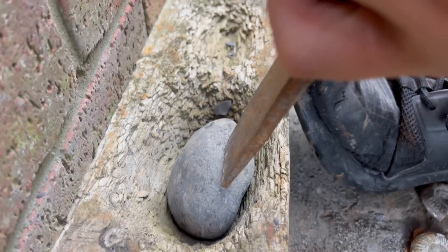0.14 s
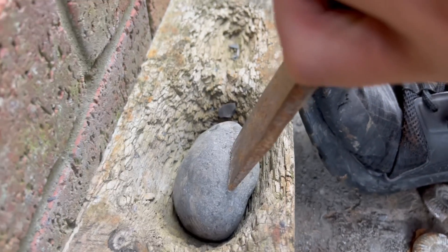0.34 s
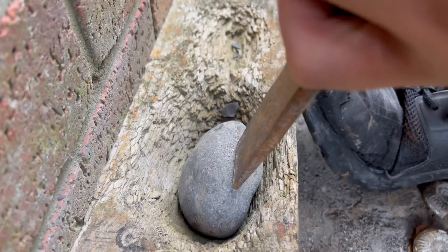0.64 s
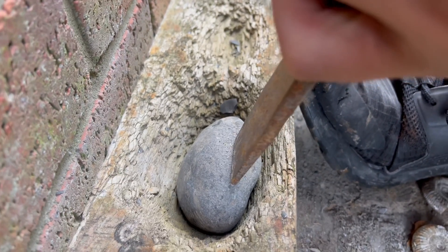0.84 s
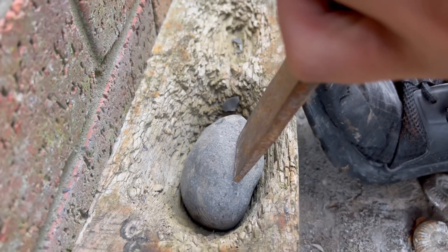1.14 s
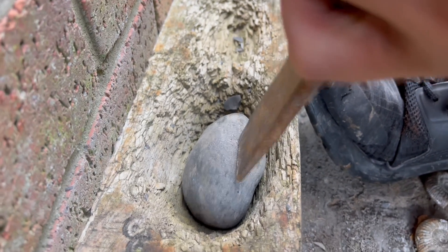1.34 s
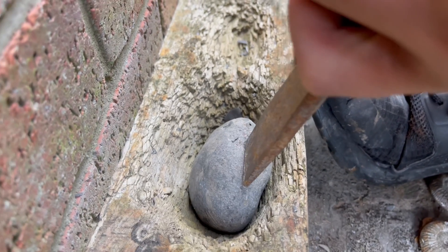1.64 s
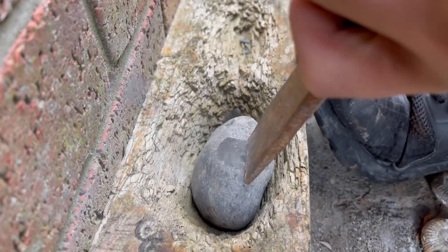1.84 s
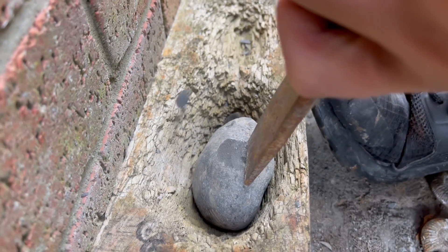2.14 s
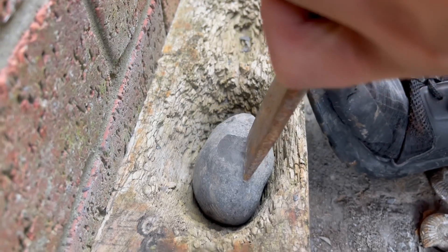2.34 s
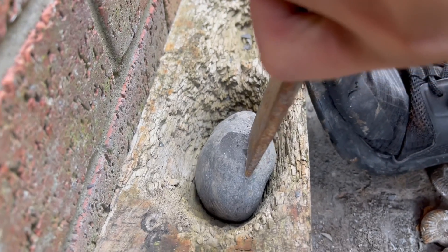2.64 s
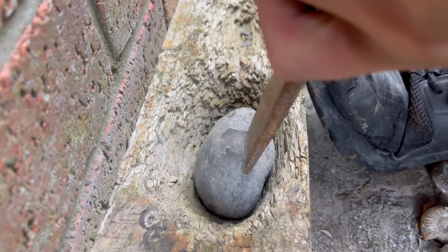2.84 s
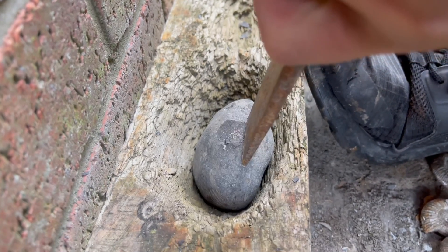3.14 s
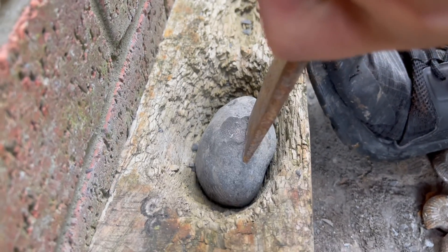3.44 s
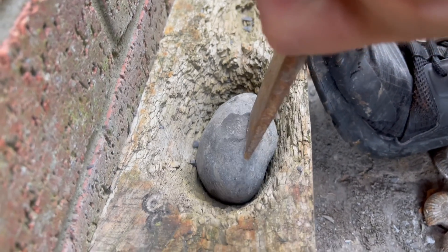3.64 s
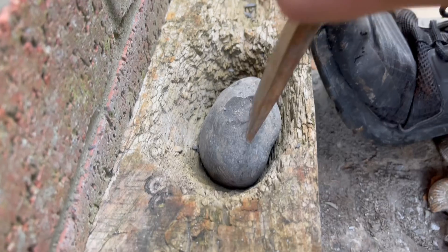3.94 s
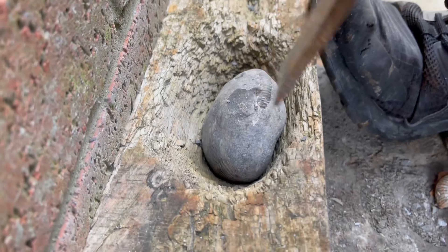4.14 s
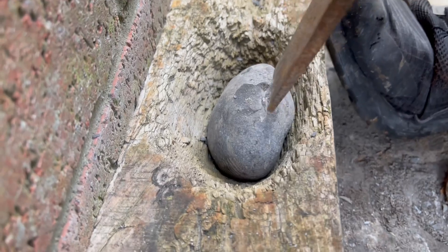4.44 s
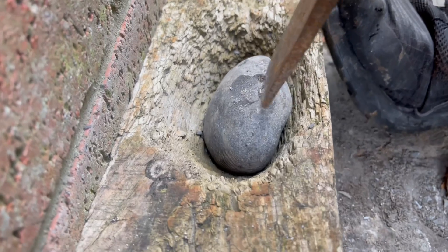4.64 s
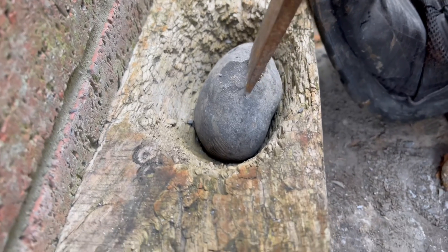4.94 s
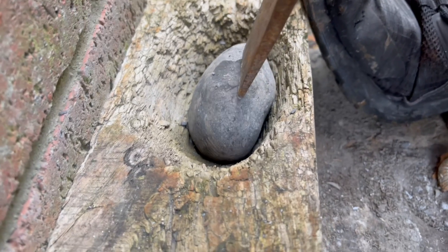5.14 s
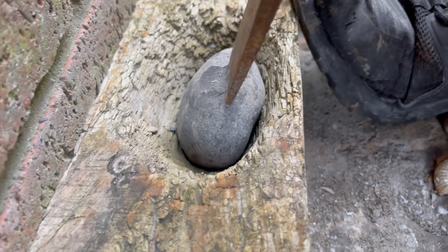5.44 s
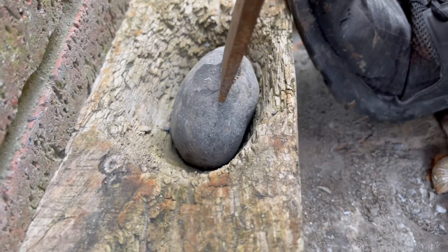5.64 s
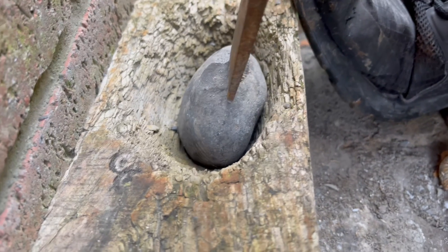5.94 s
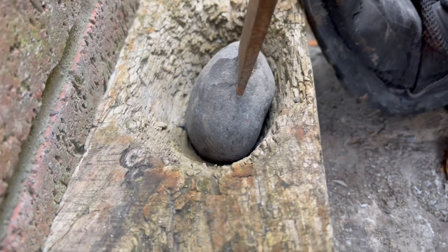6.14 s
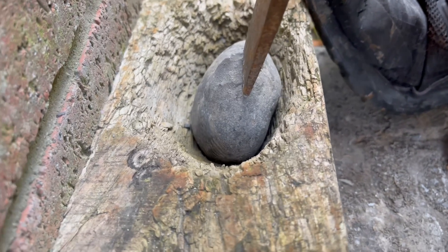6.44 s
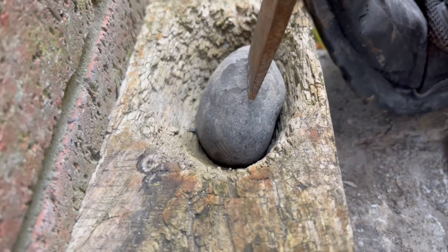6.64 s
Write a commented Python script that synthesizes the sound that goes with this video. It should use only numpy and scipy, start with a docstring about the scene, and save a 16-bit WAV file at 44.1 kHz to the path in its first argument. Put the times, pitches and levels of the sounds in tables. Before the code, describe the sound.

Steady chiselling on stone, about two blows a second, heard in stereo from very near. Each hit is a dry gritty crack, a brief steel ring and a quick falling wooden thud. Flakes patter after some blows. Midway the striking stops for a clink and soft scrapes; the next hit sounds looser and duller, then the firm rhythm returns in a quietly echoing yard.

```python
"""A hammer taps a steel chisel on a stone nodule that lies in a hollow of a wooden plank, outdoors and close by.
Each blow is a short gritty crack of filtered noise, a brief steel ring and a falling thud swept by the plank.
Chips tick down as tiny noise bursts, and in a pause the chisel clinks and scrapes its way to a new spot.
The yard answers with dense decaying echoes; low air rumble flutters over a steady distant hush."""
import sys
import numpy as np
from scipy import signal
from scipy.fft import rfft, irfft
from scipy.io import wavfile
from scipy.ndimage import uniform_filter1d

SR = 44100
rng = np.random.default_rng(int(sys.argv[2]) if len(sys.argv) > 2 else 0)


def to_wav(sig):
    """Store sig (one row per channel, or 1-D mono) as 16-bit WAV at the path in sys.argv[1].

    Samples outside -1..1 are clipped; the rate is SR.
    """
    pcm = np.clip(np.atleast_2d(sig), -1, 1) * 32767
    pcm = np.round(pcm).astype(np.int16)
    wavfile.write(sys.argv[1], SR, pcm.T)  # frames by channels


N = 299880  # length of the scene in samples

SIZE, LEAD = 16384, 256  # samples in one sound, and samples kept before its onset
HZ = np.maximum(np.fft.rfftfreq(SIZE, 1 / SR), 1)
AGE = np.arange(SIZE) / SR  # seconds since the onset
EDGES = np.interp(np.arange(SIZE), [0, LEAD / 2, .6 * SIZE, .85 * SIZE], [0, 1, 1, 0])
RIPPLE_HZ = 1800  # width over which a burst of fractures is evened out


def undb(db):
    """Decibels to gain."""
    return 10 ** (np.asarray(db) / 20)


def shape(points, hz):
    """Gain at hz of (freq_hz, level_db) points joined on a log-frequency axis."""
    at_hz, level_db = np.transpose(points)
    return undb(np.interp(np.log(np.maximum(hz, 1)), np.log(at_hz), level_db))


def bands(centres_hz, levels_db):
    """Smooth colour through a few band levels."""
    return shape(list(zip(centres_hz, levels_db)), HZ)


def causal(gain):
    """Minimum-phase response with this gain: each peak rings on after the push."""
    cepstrum = irfft(np.log(gain))
    cepstrum[1:SIZE // 2] *= 2
    cepstrum[SIZE // 2 + 1:] = 0
    return np.exp(rfft(cepstrum))


def fade(t60_s):
    """Exponential decay that falls 60 dB in t60_s."""
    return np.exp(-np.log(1000) * AGE / t60_s)


def add(track, start_s, sound):
    """Mix a sound with soft edges into both channels, its onset at start_s."""
    start = int(start_s * SR) - LEAD
    part = (np.roll(sound, LEAD, axis=-1) * EDGES)[..., :N - start]
    track[:, start:start + part.shape[-1]] += part


def widen(mid, side, apart):
    """Left and right from a shared part and a side part; apart is the side share."""
    return np.array([mid + apart * side, mid - apart * side])


def noise(points, apart):
    """Steady stereo noise of unit level with the given colour."""
    white = rng.standard_normal((2, N))
    mid, side = irfft(rfft(white) * shape(points, np.fft.rfftfreq(N, 1 / SR)), N)
    pair = widen(mid, side, apart)
    return pair / pair.std()


def crunch(contact_s, apart=0.21):
    """Stereo spectra of a burst of tiny fractures that swells and dies within a few contact times."""
    rise = 2 * AGE / contact_s
    shared, left, right = rfft(rng.standard_normal((3, SIZE)) * rise * np.exp(-rise))
    pair = shared + apart * np.array([left, right])
    # white overall; the narrower peaks that remain give every contact its own colour
    smooth_power = uniform_filter1d(abs(pair) ** 2, int(RIPPLE_HZ * SIZE / SR), axis=-1)
    return pair / np.sqrt(smooth_power)


def ring(modes, build_s, detune):
    """Modes build up as waves return from the ends; grip and seating shift them a little each time."""
    tones = np.zeros(SIZE)
    for hz, level_db, t60_s in modes:
        shifted_hz = hz * (1 + detune * rng.standard_normal())
        tones += undb(level_db) * fade(t60_s) * np.sin(2 * np.pi * shifted_hz * AGE)
    return tones * (1 - np.exp(-AGE / build_s))


# swell of the low rumble of air on the microphone, before breeze_db and flutter: time_s, level_db
BREEZE = [(0, -56.5), (.6, -58), (1.45, -54), (2.1, -61), (3.55, -59.5), (3.78, -45), (4.2, -58),
          (5.6, -60), (6.301, -58.5), (6.8, -44)]
# colour of that rumble: freq_hz, level_db
RUMBLE_COLOUR = [(12, -46), (25, -18), (45, 0), (70, 4.5), (120, -6), (200, -13.5), (320, -30), (600, -47),
                 (3000, -100)]
# colour of the far hush: freq_hz, level_db
HUSH_COLOUR = [(100, -9.5), (250, 0), (450, -4), (850, 3), (1200, -6), (1800, -13.5), (2600, -24.5),
               (4000, -31), (7000, -36.5), (10500, -33), (13500, -45.5), (17000, -53)]
HUSH_DB = -70


def air(breeze_db=1.0, flutter_db=2.5, flutter_s=.12):
    """Low rumble that swells and flutters over a steady far hush."""
    t = np.arange(N) / SR
    time_s, level_db = np.transpose(BREEZE)
    steps = rng.standard_normal(size=256)
    flutter = np.interp(t / flutter_s, np.arange(len(steps)), steps)
    gust = undb(breeze_db + np.interp(t, time_s, level_db) + flutter_db * flutter)
    return gust * noise(RUMBLE_COLOUR, apart=0.089) + undb(HUSH_DB) * noise(HUSH_COLOUR, apart=0.94)


# bending wave of the plank: freq_hz, level_db
THUD_COLOUR = [(20, -18.5), (42, -14.5), (58, -9.5), (80, -4), (120, -3), (205, -1), (320, -3), (440, -6),
               (560, -14), (720, -27), (1200, -44)]
# centres of the deep end, middle and top of the thud: freq_hz
THUD_BANDS_HZ = [80, 220, 520]
SEATED_HZ = 213  # thud pitch of a well seated stone
DEPTH_DB_PER_OCTAVE = 25  # a lower, slower thud also has more of a deep end


def thud(pitch_hz, depth_db, hardness_db, late_cycles=1.8, knee_hz=55):
    """Bending waves run slower at low pitch, so the push becomes a fast falling sweep; a lower thud is longer."""
    stretch = SEATED_HZ / pitch_hz
    hz = HZ * stretch
    deep_end_db = depth_db + DEPTH_DB_PER_OCTAVE * np.log2(stretch)
    colour = shape(THUD_COLOUR, hz) * bands(THUD_BANDS_HZ, [deep_end_db, 0, hardness_db])
    # well above the knee every frequency arrives about the same number of its own periods late
    octave_like = np.log((hz + knee_hz) / (SEATED_HZ + knee_hz))
    travel = 1j * np.exp(-2j * np.pi * late_cycles * octave_like)
    return irfft(colour * travel) * np.sqrt(stretch)


SWAY_AFTER_S, SWAY_WIDTH_S = .17, .07


def sway(hz=46):
    """A deep, soft wobble that swells up after each blow."""
    swell = np.exp(-((AGE - SWAY_AFTER_S) / SWAY_WIDTH_S) ** 2)
    return swell * np.sin(2 * np.pi * (hz * AGE + rng.random()))


# hammer blows: start_s, force_db, pitch_hz of the thud, loose (0 seated to 1 loose stone),
# clank_db of the steel, sizzle_db of crushed stone
BLOWS = [(0.3416, -1.6, 209.3, 0, -18, -22.5), (0.7977, -1, 214.2, 0.05, -18, -23.5),
         (1.2512, -.5, 211, 0, -16.5, -21.5), (1.72, 0, 230.4, 0.03, -22.5, -18.5),
         (2.1988, -1.5, 217.7, 0, -25, -22), (2.6788, 1.1, 204, 0.05, -22.5, -20.5),
         (3.1338, 0, 214.2, 0, -24.5, -17.5), (3.5856, 0.98, 204.5, 0, -20, -19),
         (5.24, 0, 179.7, 0.99, -24, -23.5), (5.6921, 1.47, 205.9, 0.14, -22.5, -21.5),
         (6.1512, 1.32, 215.6, 0, -18.5, -22), (6.6035, 0.47, 214.2, 0, -19, -22)]
# centres of knock, clank, crack and sizzle: freq_hz
BLOW_BANDS_HZ = [1100, 2200, 5500, 10500]
# steel on stone: freq_hz, level_db
CRACK_COLOUR = [(500, -17), (720, -12.5), (880, -13), (1050, -1.5), (1350, -8), (1720, -4), (2100, -11),
                (2440, -2.5), (3200, -14), (5200, -16), (8100, -10.5), (9900, -9), (11800, -13),
                (13400, -32.5), (16000, -44)]
# modes of the hand-held chisel, before detuning and the clank level: freq_hz, level_db, t60_s
CHISEL_MODES = [(2190, -39, .08), (2450, -38, .09), (2490, -38.5, .10), (2560, -38.5, 0.098),
                (4270, -46.5, .10), (3900, -43, .11), (4550, -45.5, .10)]
# plank modes, before detuning and the thud level: freq_hz, level_db, t60_s
PLANK_MODES = [(57.4, -20, 0.37), (131, -25, 0.34), (245, -33.5, 0.25), (309, -24.5, 0.12),
               (449, -29, 0.17)]
# parts of a blow at 0 dB force; knock, crack and sway then grow by so many dB per dB of force
THUD_DB, KNOCK_DB, CRACK_DB, SWAY_DB = -14.5, -20.5, -20, -47.5
KNOCK_GROWTH, CRACK_GROWTH, SWAY_GROWTH = 0.81, 1.9, 2.5
DEPTH_DB, HARDNESS_DB = -2.2, -1.46  # deep end and top of the thud of a well seated stone
# a fully loose stone travels before it meets the plank: the thud comes late and weaker,
# it knocks less and rocks in its hollow
LOOSE_LAG_S, LOOSE_THUD_DB, LOOSE_KNOCK_DB = 0.0047, -8, -3
LOOSE_DEPTH_DB, LOOSE_HARDNESS_DB = -3, 1.5
ROCK_HZ, ROCK_DB, ROCK_T60_S = 66.4, -15, .11
CRUSH_S = 0.0022  # time the tip takes to bite


def blows(crack_gain_db=43.5, thud_gain_db=52.0, steel_db=-3.5):
    """The chisel crushes stone and rings, the nodule drives the plank; force and seating set the balance."""
    out = np.zeros((2, N))
    for start_s, force_db, pitch_hz, loose, clank_db, sizzle_db in BLOWS:
        knock_db = KNOCK_DB + KNOCK_GROWTH * force_db + LOOSE_KNOCK_DB * loose
        crack_db = CRACK_DB + CRACK_GROWTH * force_db
        colour = shape(CRACK_COLOUR, HZ) * bands(BLOW_BANDS_HZ, [knock_db, clank_db, crack_db, sizzle_db])
        crack = undb(crack_gain_db) * irfft(crunch(CRUSH_S) * causal(colour))
        steel = undb(steel_db + clank_db) * ring(CHISEL_MODES, build_s=.001, detune=0.04)
        add(out, start_s, crack + steel)

        bend = thud(pitch_hz, DEPTH_DB + LOOSE_DEPTH_DB * loose, HARDNESS_DB + LOOSE_HARDNESS_DB * loose)
        wood = undb(thud_gain_db) * bend + ring(PLANK_MODES, build_s=0.0017, detune=0.03)
        wobble = undb(SWAY_DB + SWAY_GROWTH * force_db) * sway()
        low = undb(THUD_DB + force_db) * wood + wobble
        rock = loose * ring([(ROCK_HZ, ROCK_DB, ROCK_T60_S)], build_s=0.0046, detune=0)
        add(out, start_s + LOOSE_LAG_S * loose, undb(LOOSE_THUD_DB * loose) * low - rock)
    return out


def echo(dry, colour, t60_s, build_s, apart):
    """Dense reflections of one colour that build up and die away."""
    mid, side = rng.standard_normal((2, SIZE)) * fade(t60_s) * (1 - np.exp(-AGE / build_s))
    pair = widen(mid, side, apart)
    unit = pair / np.sqrt(np.sum(pair ** 2) / 2)
    response = irfft(rfft(unit) * causal(shape(colour, HZ)))
    return signal.fftconvolve(dry, response, axes=-1)[:, :N]


# quick echo of the yard: freq_hz, level_db
YARD_COLOUR = [(60, -25), (300, -19), (600, -17), (1100, -24), (2500, -22.5), (4400, -16), (7000, -24.5),
               (11500, -27), (14000, -37.5)]
# late echo from further walls: freq_hz, level_db
WALLS_COLOUR = [(100, -40.5), (450, -39), (1200, -47), (2500, -45), (3400, -44), (4400, -39), (7000, -50),
                (11000, -48.5), (14000, -69.5)]


def yard(dry):
    """Quick echoes from ground and bricks, then a faint longer tail from further walls."""
    near = echo(dry, YARD_COLOUR, t60_s=0.12, build_s=0.0017, apart=0.043)
    far = echo(dry, WALLS_COLOUR, t60_s=.7, build_s=0.056, apart=.6)
    return near + far


# the larger falling chips, before gain_db: start_s, level_db
CHIPS = [(2.395, -33), (2.731, -15), (2.864, -27), (2.8935, -12), (2.921, -26.5), (2.940, -26.5),
         (2.987, -26), (3.86, -17.5)]
# small stone flakes: freq_hz, level_db
FLAKE_COLOUR = [(200, -37.5), (500, -18.5), (1000, -5), (1600, -8.5), (2400, -3.5), (3300, -9.5),
                (4400, -8.5), (7000, -13), (11300, -7), (13000, -17), (16000, -45.5)]
CHIP_CONTACT_S = .0011
BOUNCE_S, BOUNCE_DB = .004, -8.5  # each larger chip tips over and ticks once more
DUST_SPREAD = .65  # scatter of the grains' flight times, in natural-log units


def chips(gain_db=-2, dust_db=-41, scatter_db=3.0, flight_s=0.078, shed=0.62, tilt_db=4, count=12):
    """Flakes land and bounce; blows that bite into the stone rather than clank shed louder faint grains."""
    out = np.zeros((2, N))
    flake = causal(shape(FLAKE_COLOUR, HZ))
    ticks = list(CHIPS) + [(start_s + BOUNCE_S, level_db + BOUNCE_DB) for start_s, level_db in CHIPS]
    for blow_s, *_, clank_db, sizzle_db in BLOWS:
        bite_db = dust_db + shed * (sizzle_db - clank_db)
        for late, size in rng.standard_normal((count, 2)):
            ticks.append((blow_s + flight_s * np.exp(DUST_SPREAD * late), bite_db + scatter_db * size))
    for start_s, level_db in ticks:
        # each tick leans at random to bright or dull
        tilt = undb(tilt_db * rng.standard_normal() * np.tanh(np.log(HZ / 5000)))
        tick = irfft(crunch(CHIP_CONTACT_S) * flake * tilt)
        if start_s < N / SR:
            add(out, start_s, undb(gain_db + level_db) * tick)
    return out


# soft low bumps between blows, timed at the middle of the swell: centre_s, level_db
BUMPS = [(1.144, -48), (1.435, -42), (4.541, -44), (6.461, -43), (6.509, -42)]


def bumps(hz=80, width_s=0.022):
    """Short, dull swells: a few cycles of a low sine under a bell-shaped envelope."""
    out = np.zeros((2, N))
    envelope = np.exp(-((AGE - 2 * width_s) / width_s) ** 2)
    swell = envelope * np.sin(2 * np.pi * hz * AGE)
    for centre_s, level_db in BUMPS:
        add(out, centre_s - 2 * width_s, undb(level_db) * swell)
    return out


# chisel tip placed or dragged on the stone: start_s, body_db, clink_db, pitch_hz of the clink, contact_s
TOUCHES = [(2.018, -3, -7.5, 2130, .0025), (2.029, -15, -7, 2330, .0018), (3.851, -19.5, -11, 1750, 0.012),
           (4.444, 3, 6.5, 1680, 0.00166), (4.626, -5.5, -21.5, 1780, 0.019),
           (4.680, -1, -27.5, 1780, .003), (4.848, -11.5, -26.5, 1810, 0.02),
           (4.997, -5.5, -30, 1786, .003)]
# centres of body, clink and grit: freq_hz
TOUCH_BANDS_HZ = [450, 1900, 8000]
# resonances of the lightly touched stone: freq_hz, width_hz, level_db
CLINK_RESONANCES = [(355, 150, -5.5), (456, 38, 0.5), (990, 220, -10), (3400, 150, -16), (3820, 130, -13.5),
                    (5940, 370, -7.5), (7800, 700, -6.5), (10780, 610, -6)]
TIP_WIDTH_HZ, TIP_DB = 180, -0.5  # resonance of the tip where it rests
TOUCH_GRIT_DB = -29.5  # treble of every light contact


def touches(soft_hz=12000, order=12):
    """The tip clinks and scrapes as it seeks a new hold; such light contacts lack the highest treble."""
    out = np.zeros((2, N))
    for start_s, body_db, clink_db, tip_hz, contact_s in TOUCHES:
        resonances = list(CLINK_RESONANCES) + [(tip_hz, TIP_WIDTH_HZ, TIP_DB)]
        stone = 0
        for hz, width_hz, level_db in resonances:
            stone = stone + undb(level_db) / (1 + 1j * (HZ ** 2 - hz ** 2) / (HZ * width_hz))
        softening = 1 + (HZ / soft_hz) ** order
        colour = bands(TOUCH_BANDS_HZ, [body_db, clink_db, TOUCH_GRIT_DB]) / softening
        add(out, start_s, irfft(crunch(contact_s) * causal(colour) * stone))
    return out


# the two microphone ports: freq_hz, lean_db (left minus right), lead_rad (left ahead of right)
PORTS = [(60, 3, 0.48), (560, 4, 0.33), (730, 0.5, 0.57), (907, 12, -2), (1130, 11.5, -0.82),
         (1480, 3.5, -2.04), (2430, 1, 1.54), (3300, 0, 1.51), (6700, 3, 1.15), (8370, -0.5, 1.83),
         (10340, -1, -4.5), (12200, -1, -5.4), (14800, -1, -10)]


def scene():
    """The work reaches the two ports with different strength and delay; echoes and air surround both."""
    work = blows() + touches() + chips() + bumps()
    hz = np.fft.rfftfreq(N, 1 / SR)
    at_hz, lean_db, lead_rad = np.transpose(PORTS)
    lean = undb(np.interp(hz, at_hz, lean_db) / 2)  # half the lean on each side
    lead = np.exp(1j * np.interp(hz, at_hz, lead_rad))
    direct = irfft(rfft(work) * np.array([lean * lead, 1 / lean]), N)
    return direct + yard(work) + air()


TOP_HZ = 16500


def record(dry, ceiling=0.92, order=6):
    """Soft saturation rounds the highest peaks, then a steep low-pass cuts the top."""
    rounded = dry / (1 + abs(dry / ceiling) ** order) ** (1 / order)
    low_pass = signal.ellip(8, .2, 70, TOP_HZ, fs=SR, output="sos")
    return signal.sosfilt(low_pass, rounded)


dry = scene()
out = record(dry)
to_wav(out)
```